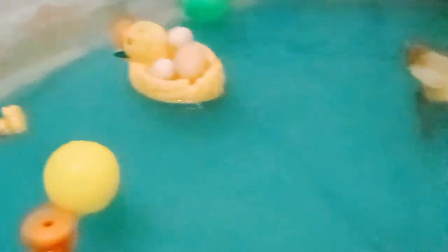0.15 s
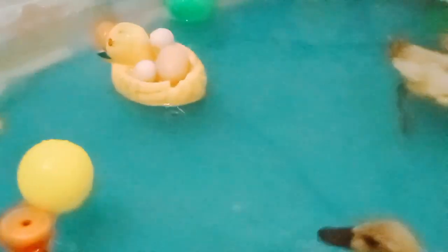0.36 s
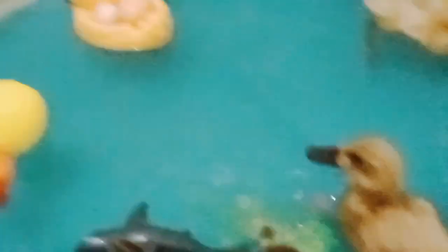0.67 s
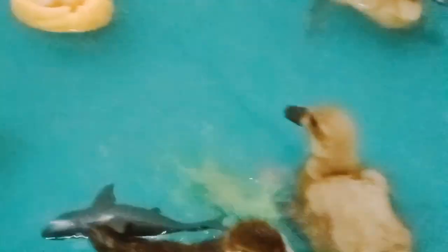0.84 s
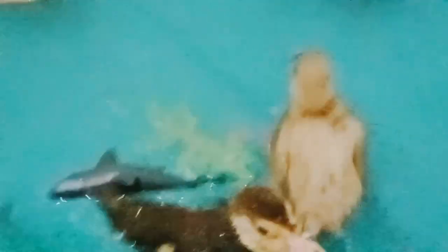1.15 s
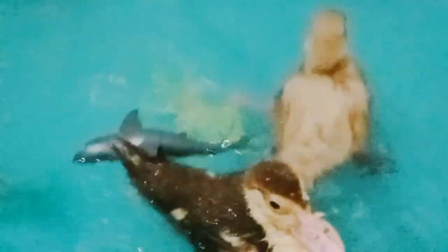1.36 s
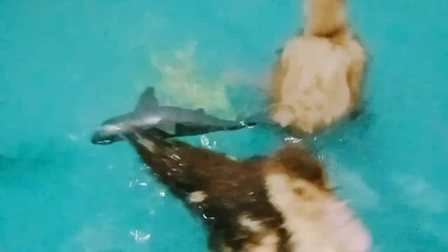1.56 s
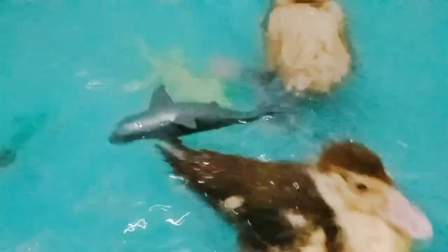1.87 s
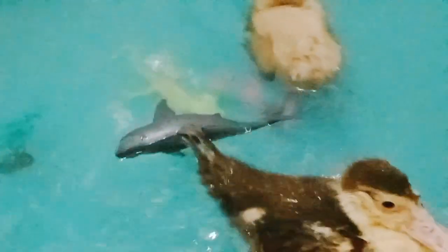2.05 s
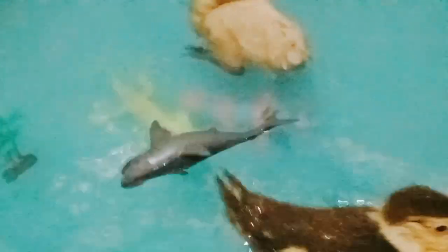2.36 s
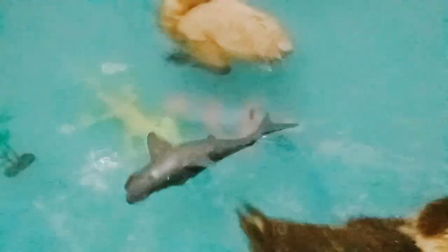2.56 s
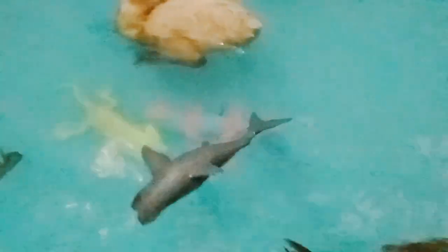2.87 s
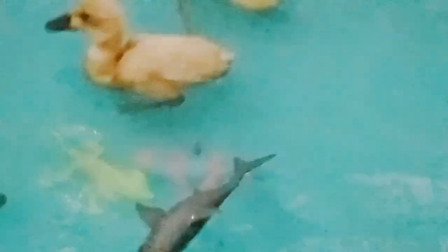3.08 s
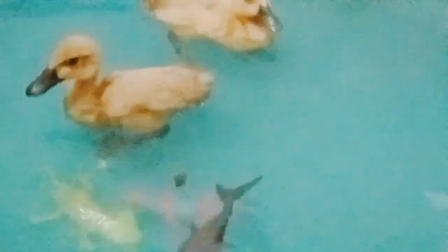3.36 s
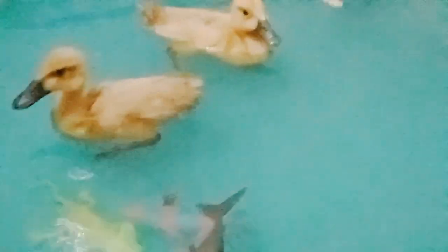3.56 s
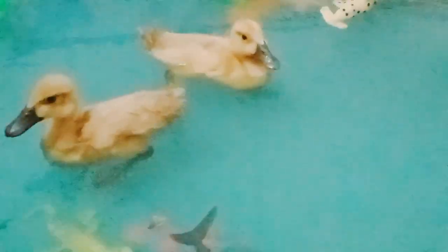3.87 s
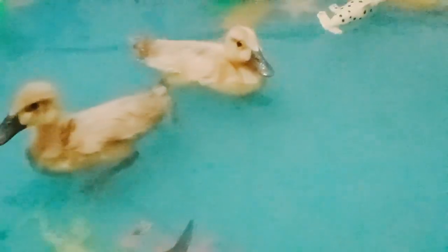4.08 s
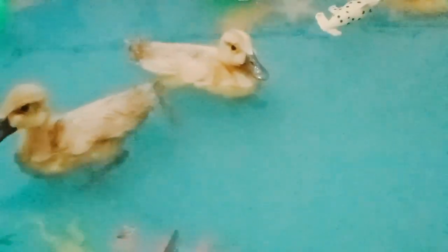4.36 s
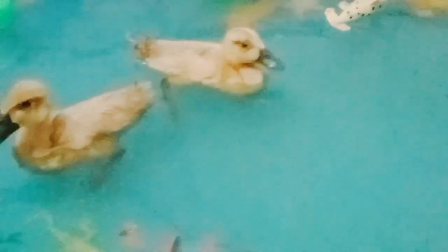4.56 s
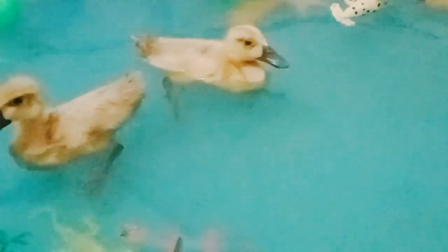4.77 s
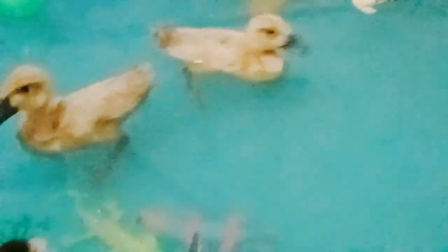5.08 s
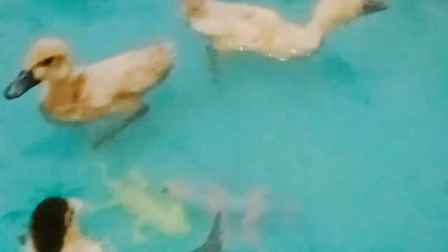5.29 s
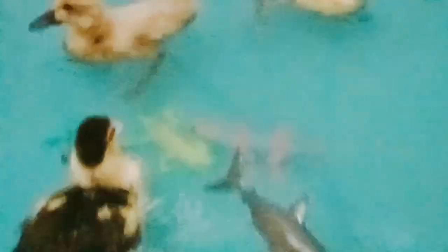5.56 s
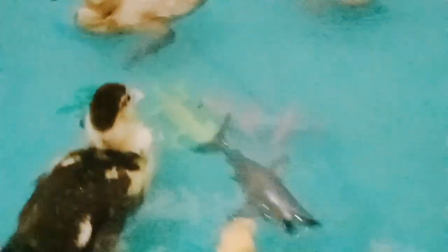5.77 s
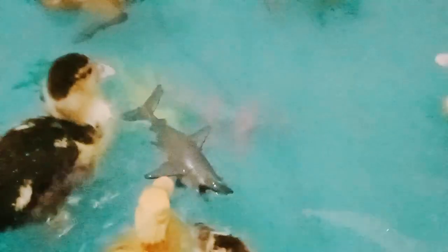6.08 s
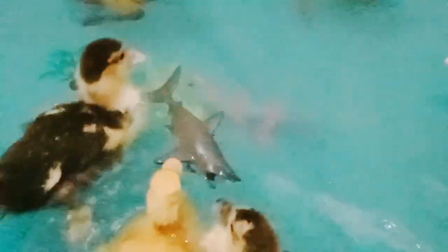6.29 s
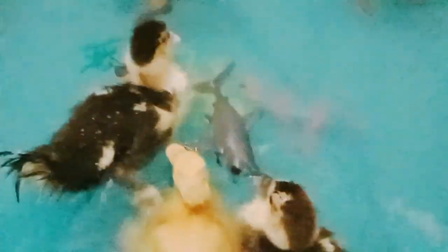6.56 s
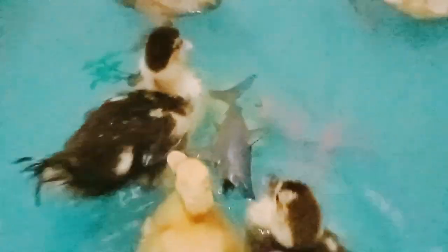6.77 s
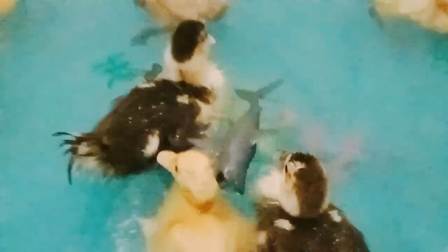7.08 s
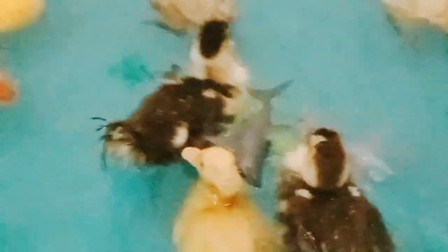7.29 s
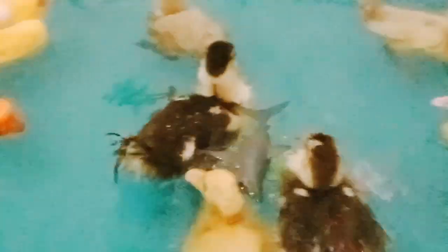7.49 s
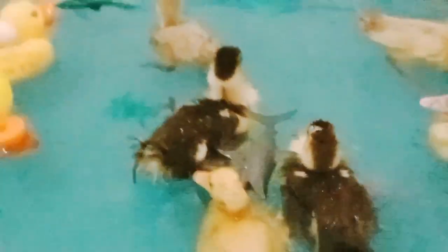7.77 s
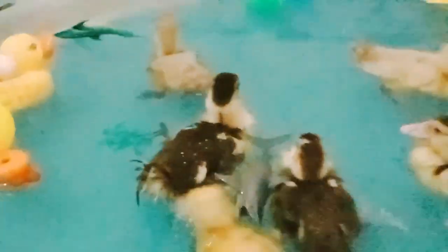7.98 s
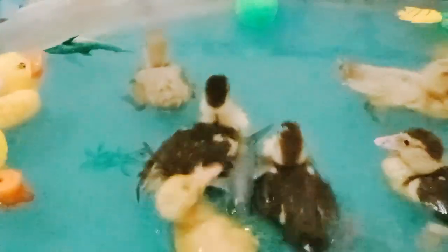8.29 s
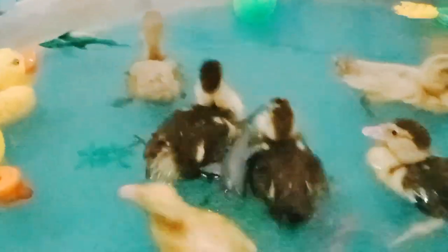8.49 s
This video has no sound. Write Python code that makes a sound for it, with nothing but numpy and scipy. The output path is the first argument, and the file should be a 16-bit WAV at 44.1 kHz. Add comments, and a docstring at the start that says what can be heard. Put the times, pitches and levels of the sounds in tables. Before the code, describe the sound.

Several ducklings peep close to the microphone in a small pool in a hard-walled room. Their high, whistling calls mix with short falling chirps and soft chatter. Two sharp knocks on the pool come early on. Midway, a run of loud, clear, evenly spaced peeps takes over, then the calls turn hoarser and sparser. Faint paddling thuds, small drips and a low room hum lie underneath.

```python
"""Ducklings peep close to the microphone, paddling in a small pool in a hard-walled room.
Each call is a nearly pure whistle from the syrinx that slides in pitch: peeps climb, turn up into
a rasp or sag hoarsely, soft calls arch, chirps fall. Feet thud softly, small blips sound
and two sharp knocks ring the pool. Room noise and a faint hum lie under it all."""
import sys
import numpy as np
from scipy import signal
from scipy.fft import rfft, irfft
from scipy.io import wavfile
from scipy.ndimage import uniform_filter1d, minimum_filter1d

SR = 44100
rng = np.random.default_rng(int(sys.argv[2]) if len(sys.argv) > 2 else 0)


def to_wav(sig):
    """Store sig (one row per channel, or 1-D mono) as 16-bit WAV at the path in sys.argv[1].

    Samples outside -1..1 are clipped; the rate is SR.
    """
    pcm = np.clip(np.atleast_2d(sig), -1, 1) * 32767
    pcm = np.round(pcm).astype(np.int16)
    wavfile.write(sys.argv[1], SR, pcm.T)  # frames by channels


N = 381024


def undb(db):
    """Decibels to gain."""
    return 10 ** (np.asarray(db) / 20)


def unit(x):
    """Scale to rms 1."""
    return x / np.sqrt(np.mean(x ** 2) + 1e-20)


def ramp(t, span):
    """Rises from 0 to 1 over the span and stays there."""
    return np.clip(t / span, 0, 1)


def wander(t, rate, count=512):
    """Random values, rate a second, joined by lines."""
    return np.interp((t - t[0]) * rate, np.arange(count), rng.standard_normal(count))


def add(track, start, sound):
    """Mix a sound into the track at a time in seconds."""
    i = max(int(start * SR), 0)
    track[i:i + len(sound)] += sound[:max(N - i, 0)]


def colour(x, points):
    """Filter by a spectrum of (Hz, dB) points."""
    hz, db = np.transpose(points)
    f = np.maximum(np.fft.rfftfreq(len(x), 1 / SR), 1)
    return irfft(rfft(x) * undb(np.interp(np.log(f), np.log(hz), db)), len(x))


def band(x, lo_hz, hi_hz):
    """Band-pass filter."""
    return signal.sosfilt(signal.butter(3, [lo_hz, hi_hz], "band", fs=SR, output="sos"), x)


# The room's steady noise. Each row: frequency in Hz, relative level in dB.
ROOM_TONE = [(18, -32.5), (30, -5.5), (143, -3.5), (385, -5), (457, -12.5), (508, -8), (701, -8.5),
             (850, -6.5), (1170, -14), (1420, -15.5), (2000, -12.5), (2380, -19.5), (3810, -15.5),
             (5040, -35), (6550, -70), (11100, -120)]
# Its slow drift. Each row: time in seconds, relative level in dB.
ROOM_TONE_DRIFT = np.vstack([ [(0.0, -51.5), (0.444, -55.5), (1.046, -54), (1.188, -55.5), (1.46, -56.5),
                   (1.6, -55.5)], [(2.1, -58.5), (3.81, -61), (4.32, -67), (5.78, -63.5), (5.91, -60.5),
                   (8.33, -61), (8.64, -60.5)], ])
# The hum in the room. Each row: time in seconds, relative levels of the low and high tone in dB.
HUM_DRIFT = [(0.0, -60, -77.5), (0.65, -55, -69), (0.98, -60, -79.5), (2.74, -64, -80), (3.58, -54, -69),
             (4.86, -68, -75.5), (6.11, -63, -62), (7.27, -65.5, -59.5), (7.85, -54.5, -45.5),
             (8.64, -68, -57.5)]

def background(low_hum_hz=76, high_hum_hz=133.4):
    """Behind the birds, room noise swells and sinks, with two wavering hum tones and a faint hiss."""
    t = np.arange(N) / SR
    noise = colour(rng.standard_normal(N), ROOM_TONE)
    noise /= np.std(band(noise, 300, 1300))
    noise_db = np.interp(t, *np.transpose(ROOM_TONE_DRIFT)) + 2 + 2.5 * wander(t, 9.9)
    out = noise * undb(noise_db)
    times, low_db, high_db = np.transpose(HUM_DRIFT)
    for hz, db in ((low_hum_hz, low_db + 5), (high_hum_hz, high_db + 2)):
        gain = undb(np.interp(t, times, db) + 1.7 * wander(t, 9.9))
        phase = 2 * np.pi * np.cumsum(hz * (1 + .025 * wander(t, 45))) / SR
        out += gain * np.sin(phase)
    return out + undb(-86) * rng.standard_normal(N)


# How long the room rings. Each row: frequency in Hz, seconds to fall by 60 dB.
ROOM_DECAY = [(200, 0.46), (800, 0.33), (3400, 0.37), (8000, 0.4)]
# First reflections off the hard walls. Each row: delay at the microphone in seconds, gain.
WALL_ECHOES = [(.0047, 0.11), (0.011, -0.33), (0.0184, .13)]

def room(x, wet_db, delay_s=.015, build_s=.016):
    """The microphone hears the direct sound, a few reflections, then a tail, longest in the bass."""
    t = np.arange(int(.7 * SR)) / SR
    noise, tail = rng.standard_normal(len(t)), 0
    log_hz = np.log1p(np.fft.rfftfreq(len(t), 1 / SR))
    log_centres = np.log([hz for hz, _ in ROOM_DECAY])
    for k, (_, t60) in enumerate(ROOM_DECAY):
        band_share = np.interp(log_hz, log_centres, np.eye(len(ROOM_DECAY))[k])
        tail = tail + irfft(rfft(noise) * band_share, len(t)) * undb(-60 * t / t60)
    tail *= ramp(t - delay_s, build_s)
    response = undb(wet_db) * tail / np.linalg.norm(tail)
    response[0] = 1
    for lag, gain in WALL_ECHOES:
        response[int(lag * SR)] += gain
    return signal.fftconvolve(x, response)[:N]


def lapping(count=500, spread_db=3):
    """Tiny scattered ticks of water stirred by the birds."""
    impulses = np.zeros(N)
    impulses[rng.integers(0, N, count)] = undb(spread_db * np.minimum(rng.exponential(size=count), 4))
    t = np.arange(SR // 50) / SR
    tick = rng.standard_normal(len(t)) * np.exp(-t / .003)
    ticks = signal.fftconvolve(impulses, tick)[:N]
    spectrum = [(200, -7), (800, -5), (2000, 2), (5000, -16.5), (14000, -36.5)]
    return undb(-74.5) * unit(colour(ticks, spectrum))


# Low sloshes in the pool. Each row: start in seconds, length in seconds, level in dB.
SLOSHES = [(1.304, 0.16, -51), (5.742, 0.19, -56), (6.686, 0.074, -50), (7.36, 0.31, -52)]

def sloshes():
    """Water heaves and gurgles where a bird turns."""
    gate = np.zeros(N)
    for start, length, db in SLOSHES:
        add(gate, start, undb(db) * signal.windows.tukey(int(length * SR), .7))
    gurgle = undb(2.6 * wander(np.arange(N) / SR, 36))
    return gate * gurgle * unit(band(rng.standard_normal(N), 230, 320))


def damped_rings(events, gain_db, cycles, pitch_rise):
    """Each event rings for a few cycles at an unsteady, slightly rising pitch."""
    out, t = np.zeros(N), np.arange(SR // 4) / SR
    for start, db, hz in events:
        age = t * hz / cycles
        pitch = hz * (1 + pitch_rise * (1 - np.exp(-age)) + .23 * wander(t, hz))
        envelope = np.exp(-age) * (1 - np.exp(-6 * age))
        add(out, start, undb(db + gain_db) * envelope * np.sin(2 * np.pi * np.cumsum(pitch) / SR))
    return out


# Short ringing blips: drips and bubbles, and at 6.05 s a duckling's brief low undertone.
# Each row: start in seconds, relative level in dB, pitch in Hz.
BLIPS = [(.404, -48, 510), (.593, -39, 1760), (.634, -32.5, 1080), (2.168, -40, 1440), (6.05, -38, 1935),
         (8.037, -46, 1220)]

def blips():
    """Small tones ring briefly and rise a little in pitch as they die."""
    return damped_rings(BLIPS, gain_db=6, cycles=7.3, pitch_rise=.04)


# Feet paddling under water. Each row: start in seconds, relative level in dB, lower mode in Hz.
KICKS = [(0.869, -46, 89.3), (0.998, -46, 146), (2.945, -40.5, 96.4), (3.472, -36, 141.8),
         (3.87, -32, 117.4), (5.743, -37.5, 89.7), (5.82, -37, 92.5), (5.906, -36, 129.6),
         (5.992, -31, 131), (6.581, -37, 82), (7.456, -36.5, 227), (7.517, -34, 115.5), (8.039, -37.5, 139)]

def thuds():
    """A kick shoves the water and bumps the floor of the pool, which answers with two low modes."""
    overtones = [(start, db - 6, hz * 1.65) for start, db, hz in KICKS]
    lower = damped_rings(KICKS, gain_db=3, cycles=3.2, pitch_rise=.036)
    upper = damped_rings(overtones, gain_db=2.5, cycles=3, pitch_rise=.04)
    return band(lower + upper, 70, 450)


# The pool's modes. Each row: frequency in Hz, relative level in dB, seconds to fall by 60 dB.
POOL_MODES = [(225, -13, 0.3), (286.6, -1.5, 0.13), (317, -16.5, 0.086), (570, -32.5, .03),
              (658.5, -5.5, 0.028), (754.4, -3, 0.037), (814.5, 3.5, 0.024), (976, 1, 0.022),
              (1026, -4, 0.044), (1149, -6.5, 0.024), (1470, 0.5, 0.011), (1980, -5.5, 0.019),
              (3400, -16, .012)]
# Knocks on the pool. Each row: start in seconds, relative level in dB, favoured pitch in Hz.
KNOCKS = [(1.677, -12.5, 1530), (1.775, -6.5, 807)]

def knocks(focus_db_per_octave=6, crack_db=-17):
    """A dull crack and the damped modes of the pool, weighted towards the pitch the blow favours."""
    out, t = np.zeros(N), np.arange(SR // 5) / SR
    for start, db, centre_hz in KNOCKS:
        ring = np.zeros(len(t))
        for k, (hz, mode_db, t60) in enumerate(POOL_MODES):
            struck_db = mode_db - focus_db_per_octave * abs(np.log2(hz / centre_hz))
            ring += (-1) ** k * undb(struck_db - 60 * t / t60) * np.sin(2 * np.pi * hz * t)
        crack = rng.standard_normal(len(t)) * np.exp(-t / .017)
        add(out, start, undb(db) * (ring / np.abs(ring).max() + undb(crack_db) * crack))
    return colour(out, [(50, -28.5), (140, -7), (230, 4), (1900, 3), (2500, 1), (4200, -2),
                        (6000, -32), (9000, -41), (14000, -57)])


# What a duckling's throat passes of the overtones. Each row: frequency in Hz, gain in dB.
THROAT = [(3500, -6), (5000, 6), (6300, -0.5), (7200, -7.5), (8500, -4.5), (10500, -13), (13000, -12.5)]

def whistle(t, hz, overtone_db, jitter, shimmer=.1, buzz=0, buzz_hz=300, third_db=-9):
    """The syrinx: a wavering sine with weak overtones; a slow second vibration makes it buzz."""
    phase = 2 * np.pi * np.cumsum(hz * (1 + jitter * wander(t, 450))) / SR
    flutter = 2 * np.pi * np.cumsum(buzz_hz * (1 + .025 * wander(t, 80))) / SR
    phase += .8 * buzz * np.sin(flutter)
    tone = np.sin(phase)
    for k, db in ((2, overtone_db), (3, overtone_db + third_db)):
        tone += undb(db + np.interp(k * hz, *np.transpose(THROAT))) * np.sin(k * phase)
    return tone * (1 - .5 * buzz * np.cos(flutter)) * (1 + shimmer * wander(t, 300))


def effort(t, length, attack_s, lead_db, fade_db, release_s, tail_db, edge_s=.011, uneven_db=1.68):
    """Gain of a call: a faint lead-in, the attack, an uneven hold, and a release into a faint tail."""
    lead = lead_db * (1 - ramp(t + attack_s / 2, attack_s))
    hold = fade_db * ramp(t, length)
    tail = tail_db * ramp(t - length, release_s)
    edges = ramp(t - t[0], edge_s) * ramp(t[-1] - t, edge_s)
    gain = undb(lead + hold + tail + uneven_db * wander(t, 70)) * edges
    return uniform_filter1d(gain, size=150, mode="constant")


def unsteadiness(t, length, held, loose):
    """Pitch jitter: large before the vibration settles and as it collapses, small in between."""
    return held + loose * (ramp(-t, .0067) + ramp(t - length, .0067))


def bend(t, length, scoop, rise_s, drop, fall_s):
    """Pitch factor: a call scoops up as pressure builds and drops as it goes."""
    return (1 - scoop * ramp(-t, rise_s) ** 2) * (1 - drop * ramp(t - length, fall_s))


def voice(t, hz, overtone_db, jitter, buzz, shimmer=.033, strain_hz=3600, undertone_db=-25):
    """A held whistle; on the highest notes alternate cycles differ, adding a scratchy lower octave."""
    strain = ramp(hz - strain_hz, 200) * signal.windows.tukey(len(t), .3)
    undertone = whistle(t, hz / 2, overtone_db=-60, jitter=.04, shimmer=.3)
    return whistle(t, hz, overtone_db, jitter, shimmer, buzz) + undb(undertone_db) * strain * undertone


def squeak(hz, length_s=.028):
    """The pitch overshoots and creaks for a moment before a call takes hold."""
    t = np.arange(int(length_s * SR)) / SR
    arch = hz * np.interp(t / length_s, [0, .4, 1], [.84, 1.02, .92])
    creak = whistle(t, arch, overtone_db=-46, jitter=.014, shimmer=.077)
    return signal.windows.tukey(len(t), .7) * creak


# The colour of a rasp. Each row: frequency in Hz, gain in dB.
RASP_SPECTRUM = [(400, -36), (1000, -14), (1650, -3.5), (2100, 7.5), (2700, -6.5), (3800, 8), (4550, -5),
                 (5000, -15), (6500, -33), (8000, -35), (12000, -59.5)]

def rasp(from_hz, length_s, flick_hz=4450, flick_s=.034, flick_db=-1, noise_db=-2):
    """The vibration breaks up into noise around a rough flick of pitch."""
    t = np.arange(int(length_s * SR)) / SR
    hz = from_hz + (flick_hz - from_hz) * ramp(t, flick_s)
    flick = undb(flick_db) * whistle(t, hz, overtone_db=-40, jitter=.045, shimmer=.4)
    noise = undb(noise_db) * rng.standard_normal(len(t))
    fade = signal.windows.tukey(len(t), .7) * np.exp(-t / .04)
    return fade * colour(flick + noise, RASP_SPECTRUM)


# The colour of an opening bill's pop. Each row: frequency in Hz, gain in dB.
POP_SPECTRUM = [(200, -14), (450, -1), (600, 19), (800, 3.5), (1200, -0.5), (2000, 21), (4500, -9.5),
                (6000, -21), (9000, -31), (14000, -48)]
# Soft pops, heard at close range. Each row: start in seconds, relative level in dB.
BILL_POPS = [(4.018, -45.5), (4.294, -51.5), (4.584, -47), (4.851, -41.5), (5.134, -40), (5.381, -46),
             (5.421, -42), (8.414, -46)]

def bill_pops(length_s=.028):
    """A puff of air rings the throat as the bill opens."""
    gate = np.zeros(N)
    for start, db in BILL_POPS:
        add(gate, start, undb(db) * signal.windows.hann(int(length_s * SR)))
    return colour(gate * rng.standard_normal(N), POP_SPECTRUM)


# Scratchy catches. Each row: start in seconds, opening pitch in Hz, relative level in dB.
VOICE_CRACKS = [(2.86, 4180, -34), (5.385, 4030, -32), (8.497, 3080, -33.5)]

def voice_cracks(length_s=.037):
    """A voice cracks into a brief rasp in the middle of the chatter."""
    out = np.zeros(N)
    for start, hz, db in VOICE_CRACKS:
        add(out, start, undb(db) * rasp(hz, length_s, flick_hz=3800))
    return out


# Quiet chatter in the pool. Each row: start and length in seconds, first and last pitch of the
# slide in Hz, level in dB, overtone in dB before the throat.
SOFT_CALLS = [(0.489, 0.18, 2830, 3633, -27.5, -41), (1.545, 0.045, 3330, 3040, -27, -36),
              (1.79, 0.054, 3590, 2970, -27, -30), (2.058, 0.067, 3410, 2988, -25, -30.5),
              (2.67, .05, 1950, 1750, -37, -42), (3.206, 0.14, 3220, 3107, -20.5, -41.5),
              (3.517, 0.051, 3104, 3054, -19.5, -39.5), (3.63, 0.059, 3410, 3300, -24, -48),
              (3.678, 0.026, 3307, 3200, -11, -56.5), (3.934, 0.058, 3340, 3216, -17, -51),
              (4.219, 0.048, 3395, 3143, -25, -46.5), (6.541, 0.081, 2165, 1906, -38, -35.5),
              (7.863, 0.035, 2940, 3490, -34.5, -42), (7.892, 0.028, 3060, 2765, -31.5, -32.5),
              (8.085, 0.053, 3520, 3420, -27.5, -46.5), (8.156, 0.028, 3040, 4000, -39, -34),
              (8.196, 0.025, 3090, 2940, -28.5, -28.5), (8.434, 0.074, 3228, 2970, -32, -32.5),
              (8.495, 0.015, 3295, 2884, -17.5, -45)]

def soft_calls(rise_s=.028, fall_s=.04, waver=.0052):
    """A relaxed arch: up from a low murmur of the syrinx, along a gentle slide and down again."""
    out = np.zeros(N)
    for start, length, from_hz, end_hz, db, overtone_db in SOFT_CALLS:
        t = np.arange(-rise_s, length + fall_s, 1 / SR)
        hz = (from_hz + (end_hz - from_hz) * ramp(t, length)) * (1 + waver * wander(t, 90))
        hz *= bend(t - .006, length - .006, scoop=.3, rise_s=rise_s + .006, drop=.4, fall_s=fall_s)
        gain = effort(t, length, attack_s=.011, lead_db=-14, fade_db=0, release_s=.0033, tail_db=-14)
        jitter = unsteadiness(t, length, held=.012, loose=.03)
        tone = whistle(t, hz, overtone_db, jitter, shimmer=.37, third_db=-16.5)
        add(out, start - rise_s, undb(db) * gain * tone)
    return out


# Sagging peeps. Each row: start and length in seconds, first and last pitch in Hz, level in dB.
HOARSE_PEEPS = [(5.029, 0.099, 3910, 3600, -24), (5.967, 0.082, 3973, 3572, -15),
                (6.411, 0.1, 3868, 3590, -14), (6.884, .12, 4053, 3500, -19),
                (7.643, 0.1, 3894, 3626, -26.5)]

def hoarse_peeps(rise_s=.022, fall_s=.035, sag_power=1.8, squeak_db=-20, squeak_lead_s=.03):
    """A buzzing note that starts high and settles as it fades."""
    out = np.zeros(N)
    for start, length, from_hz, end_hz, db in HOARSE_PEEPS:
        t = np.arange(-rise_s, length + fall_s, 1 / SR)
        hz = end_hz + (from_hz - end_hz) * (1 - ramp(t, length)) ** sag_power
        gain = effort(t, length, attack_s=.014, lead_db=-22.5, fade_db=-3.5, release_s=.01, tail_db=-25)
        jitter = unsteadiness(t, length, held=.0099, loose=.06)
        tone = voice(t, hz, overtone_db=-47, jitter=jitter, buzz=.75, shimmer=.24, undertone_db=-38.5)
        add(out, start - rise_s, undb(db) * gain * tone)
        add(out, start - squeak_lead_s, undb(db + squeak_db) * squeak(from_hz))
    return out


# Peeps that dip and turn up. Each row: start and length in seconds, pitch of the trough in Hz,
# level in dB, buzz from 0 to 1, relative level of the rasp in dB.
UPTURNED_PEEPS = [(0.025, .088, 3613, -16, 0.14, -26), (.56, 0.095, 3774, -25.5, 0.96, -22.5),
                  (1.271, 0.053, 3903, -19, 0.2, -23), (2.211, 0.067, 3657, -19, 0.3, -28.5),
                  (2.749, 0.082, 3550, -17, 0.83, -23), (3.416, 0.098, 3702, -20.5, .4, -27),
                  (4.023, 0.073, 3605, -28, 0.5, -37.5), (5.369, 0.05, 3750, -25, 0.4, -42),
                  (6.044, .082, 3540, -12.5, 0.51, -23), (6.652, .076, 3490, -15, .03, -22.5),
                  (7.305, .072, 3620, -15.5, 0.13, -25)]

def upturned_peeps(rise_s=.02, fall_s=.03, dip=.055, upturn=.073, trough_at=.48, squeak_db=-20):
    """A note that sinks into a shallow trough, tightens again and breaks off in a rasp."""
    out = np.zeros(N)
    for start, length, low_hz, db, buzz, rasp_db in UPTURNED_PEEPS:
        t = np.arange(-rise_s, length + fall_s, 1 / SR)
        progress = ramp(t, length)
        sink = dip * ramp(trough_at - progress, trough_at) ** 2
        lift = upturn * ramp(progress - trough_at, 1 - trough_at) ** 2
        hz = low_hz * (1 + sink + lift) * (1 + .0065 * wander(t, 90))
        hz *= bend(t, length + fall_s / 2, scoop=.15, rise_s=rise_s, drop=.72, fall_s=fall_s / 2)
        gain = effort(t, length, attack_s=.0051, lead_db=-18.5, fade_db=-4, release_s=.0039, tail_db=-17)
        jitter = unsteadiness(t, length, held=.005 + .013 * buzz, loose=.013)
        tone = voice(t, hz, overtone_db=-50, jitter=jitter, buzz=buzz)
        add(out, start - rise_s, undb(db) * gain * tone)
        add(out, start - rise_s, undb(db + squeak_db) * squeak(1.12 * low_hz))
        add(out, start + length - .008, undb(rasp_db) * rasp(low_hz * (1 + upturn), length_s=.055))
    return out


# Short falling chirps. Each row: start and length in seconds, first and last pitch of the slide
# in Hz, then level, its change along the call and overtone before the throat, all in dB.
CHIRPS = [(0.872, 0.032, 3620, 2410, -13, -22, -48.5), (0.992, 0.031, 3740, 2530, -13.5, -18, -48.5),
          (1.131, 0.032, 3780, 2556, -17.5, -11.5, -52.5), (1.354, 0.03, 3960, 2620, -22, -17.5, -46),
          (2.153, 0.036, 2916, 2094, -26, -1.5, -32), (2.247, 0.052, 3240, 2140, -18.5, -10, -29.5),
          (2.362, 0.054, 3400, 2280, -23, -2.5, -28.5), (2.522, 0.058, 3270, 2215, -10.5, -1, -41),
          (2.639, .038, 3910, 2926, -27.5, 8, -42), (2.766, 0.068, 3210, 2350, -22, -11.5, -32.5),
          (2.871, 0.049, 3450, 2965, -18, -7, -61), (2.929, .063, 3550, 2264, -8, -21, -43.5),
          (3.001, 0.052, 2700, 2030, -29.5, 2.5, -36.5), (3.114, 0.06, 3030, 2136, -4, -19, -50),
          (3.266, 0.069, 2895, 2205, -4.5, -15, -54), (3.283, .072, 3410, 2944, -9, -5.5, -48.5),
          (3.347, 0.056, 3810, 3000, -28.5, 11, -42), (3.553, 0.081, 2751, 2391, -14, 1, -59.5),
          (3.806, 0.071, 2870, 2294, -10.5, -6.5, -51.5), (4.06, .074, 2794, 2330, -15, -8, -46),
          (4.283, 0.075, 2834, 2386, -14.5, -8, -53.5), (4.522, 0.085, 2847, 2442, -18.5, -0.5, -47.5),
          (4.773, 0.068, 2935, 2313, -21.5, 4, -47.5)]

def chirps(rise_s=.013, fall_s=.011, brighten_db=5, slack_hz=2200, slack_db=-17, squeak_db=-35):
    """A faint creak at the top, then a loud slide down at a steady number of octaves a second."""
    out = np.zeros(N)
    for start, length, from_hz, end_hz, db, fade_db, overtone_db in CHIRPS:
        t = np.arange(-rise_s, length + fall_s, 1 / SR)
        hz = from_hz * (end_hz / from_hz) ** ramp(t, length) * (1 + .014 * wander(t, 110))
        hz *= bend(t, length, scoop=.06, rise_s=rise_s, drop=.31, fall_s=fall_s)
        gain = effort(t - .004, length - .004, attack_s=.0079, lead_db=-19.5, fade_db=fade_db,
                      release_s=.021, tail_db=-9.5)
        # as the membranes slacken the overtones come up, and the lowest notes hardly sound
        rising_overtone_db = overtone_db + brighten_db * (ramp(t, length / 2) - 1)
        gain *= undb(slack_db * ramp(slack_hz - hz, 600))
        jitter = unsteadiness(t, length, held=.016, loose=.018)
        tone = whistle(t, hz, rising_overtone_db, jitter, shimmer=.64, third_db=-7)
        add(out, start - rise_s, undb(db) * gain * tone)
        add(out, start - .014, undb(squeak_db) * squeak(1.14 * from_hz))
    return out


# Loud, clear peeps close to the microphone. Each row: start and length in seconds, first and
# held pitch in Hz, level in dB.
LOUD_PEEPS = [(3.801, 0.067, 3195, 3172, -9), (4.061, .07, 3278, 3332, -4), (4.334, 0.076, 3165, 3476, -5),
              (4.607, 0.096, 2970, 3513, -6.5), (4.879, .094, 3072, 3550, -6), (5.16, .107, 3025, 3495, -6),
              (5.446, .097, 3026, 3487, -5.5)]

def loud_peeps(rise_s=.02, climb_s=.031, fall_s=.04, rasp_db=-35, waver=.0062):
    """A pure note climbs and levels off, then breaks and plunges."""
    out = np.zeros(N)
    for start, length, from_hz, held_hz, db in LOUD_PEEPS:
        t = np.arange(-rise_s, length + fall_s, 1 / SR)
        hz = held_hz + (from_hz - held_hz) * np.exp(-np.maximum(t, 0) / climb_s)
        hz *= bend(t, length + .0078, scoop=.37, rise_s=rise_s, drop=.56, fall_s=fall_s - .005)
        hz *= 1 + waver * wander(t, 90)
        gain = effort(t - .003, length - .004, attack_s=.025, lead_db=-17, fade_db=-1,
                      release_s=.0055, tail_db=-24.5)
        jitter = unsteadiness(t, length, held=.0028, loose=.035)
        tone = voice(t, hz, overtone_db=-51, jitter=jitter, buzz=.06, undertone_db=-40)
        add(out, start - rise_s, undb(db) * gain * tone)
        add(out, start + length - .002, undb(db + rasp_db) * rasp(.96 * held_hz, length_s=.06))
    return out


def scene():
    """One microphone by the pool: birds and water ring in the room, over the background."""
    birds = room(loud_peeps() + bill_pops(), wet_db=-7)
    birds += room(upturned_peeps() + hoarse_peeps() + voice_cracks(), wet_db=-7.5)
    birds += room(soft_calls(), wet_db=-5.5)
    birds += room(chirps(), wet_db=-5)
    small_sounds = blips() + lapping() + sloshes()
    pool = room(knocks() + small_sounds, wet_db=-3.5) + room(thuds(), wet_db=-13.5)
    return (birds + pool + background())[None]


def record(dry, ceiling=.88, top_hz=15500):
    """The recorder eases its gain down around the loudest peaks and cuts the top."""
    gain = minimum_filter1d(ceiling / np.maximum(np.abs(dry), ceiling), size=441)
    eased_gain = uniform_filter1d(uniform_filter1d(gain, size=220), size=220)
    low_pass = signal.ellip(8, .2, 70, top_hz, fs=SR, output="sos")
    return signal.sosfilt(low_pass, dry * eased_gain)


dry = scene()
out = record(dry)
to_wav(out)
```